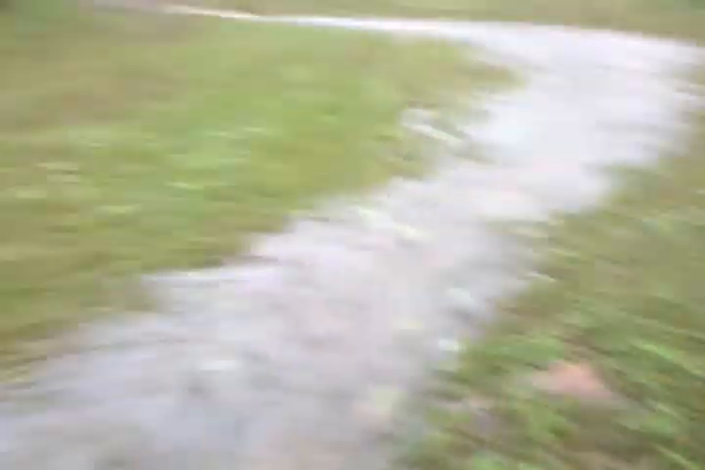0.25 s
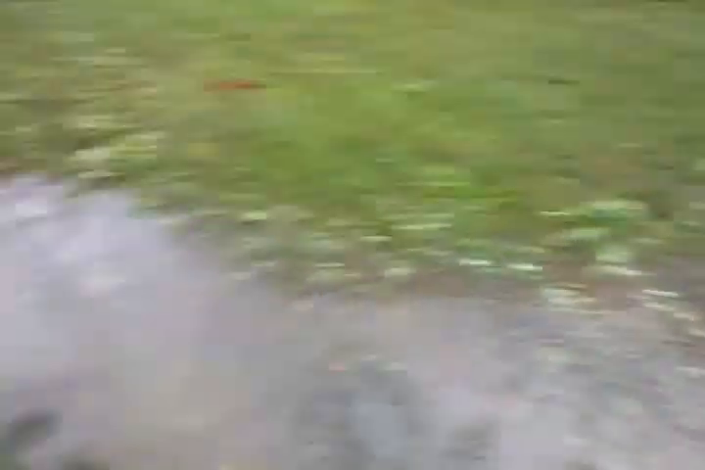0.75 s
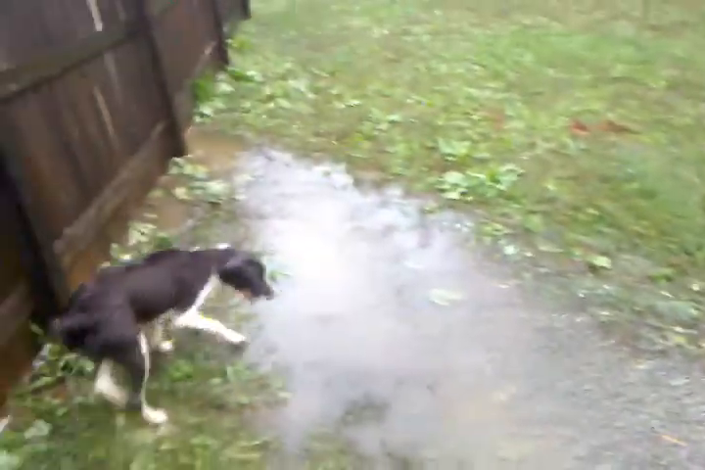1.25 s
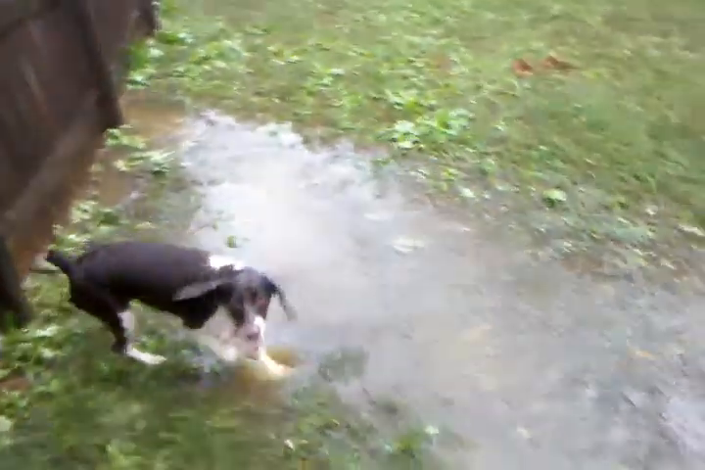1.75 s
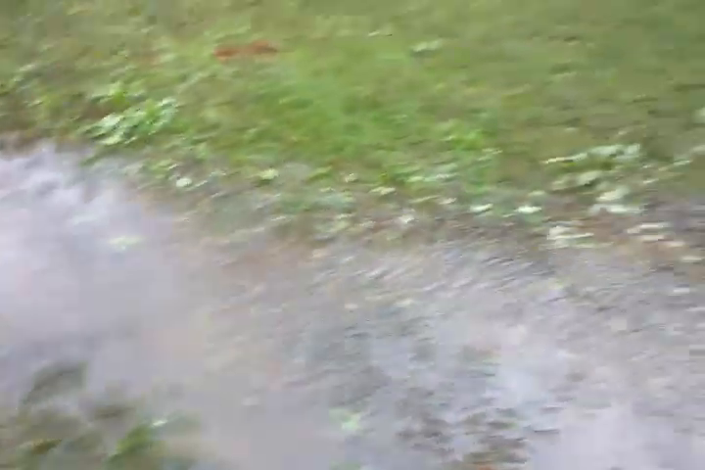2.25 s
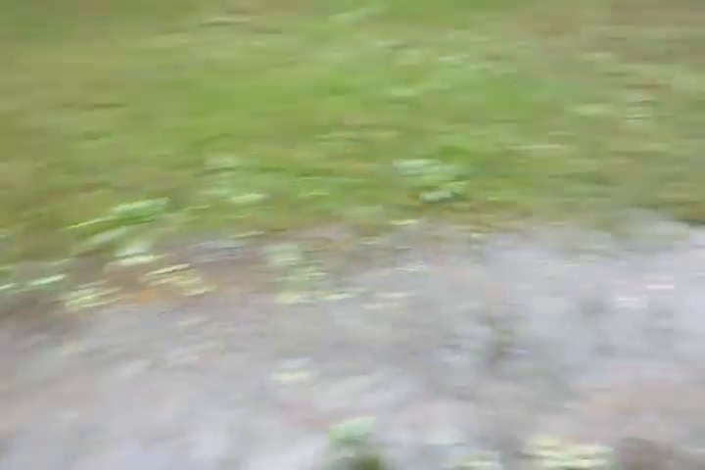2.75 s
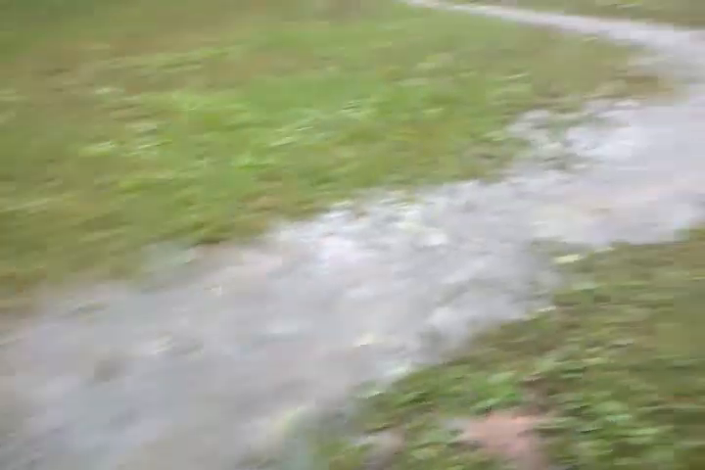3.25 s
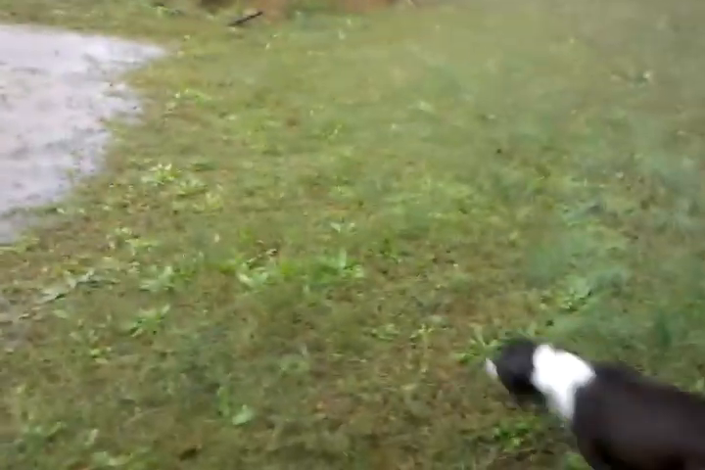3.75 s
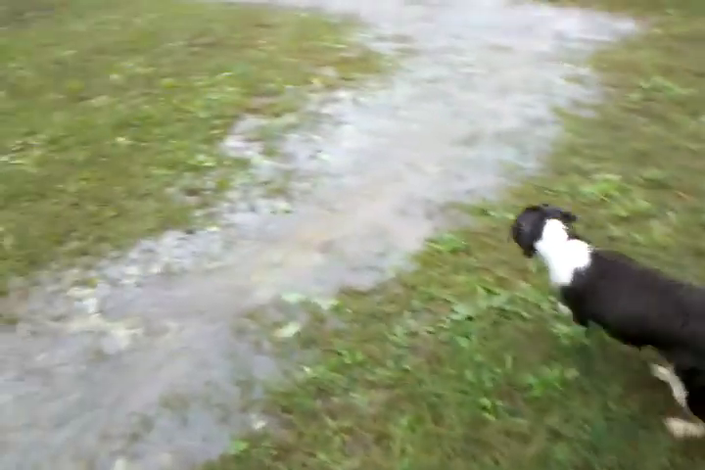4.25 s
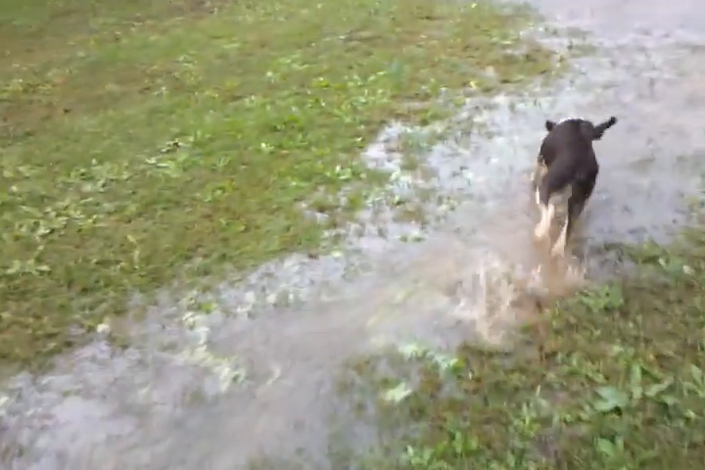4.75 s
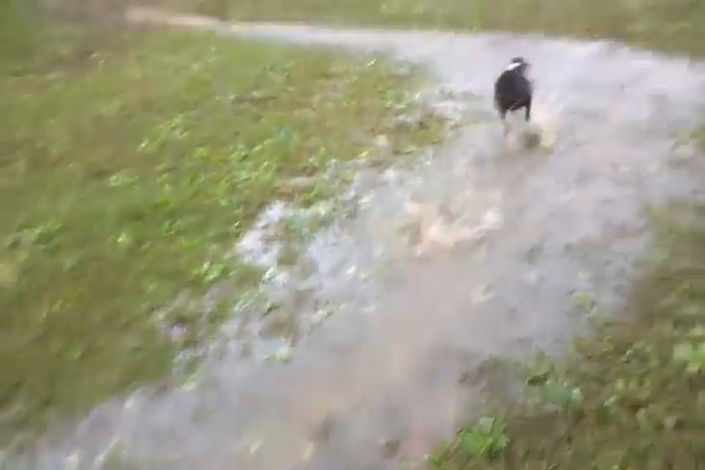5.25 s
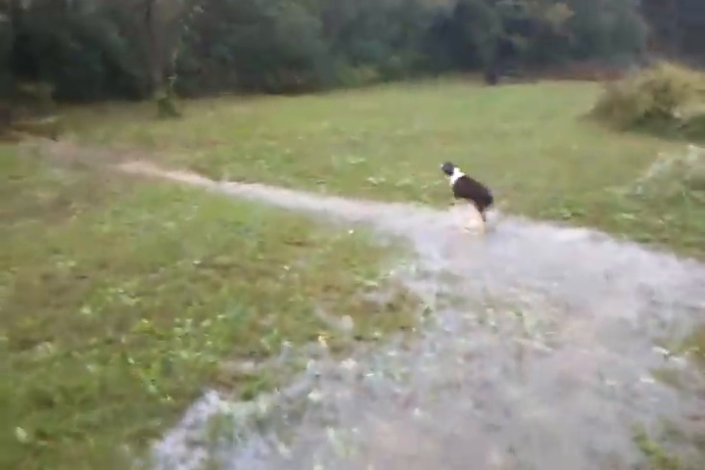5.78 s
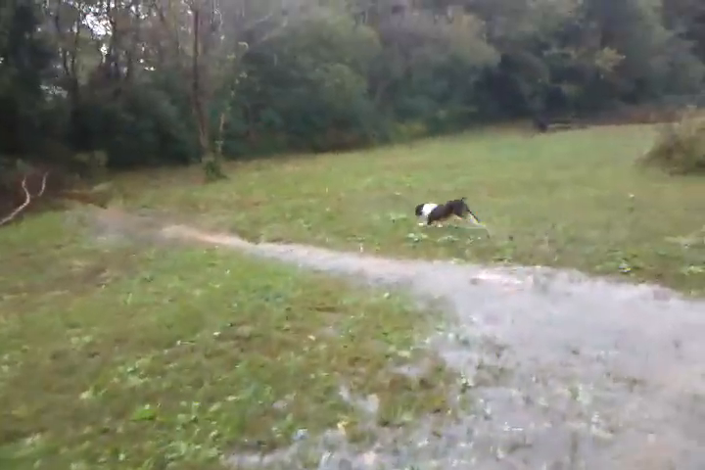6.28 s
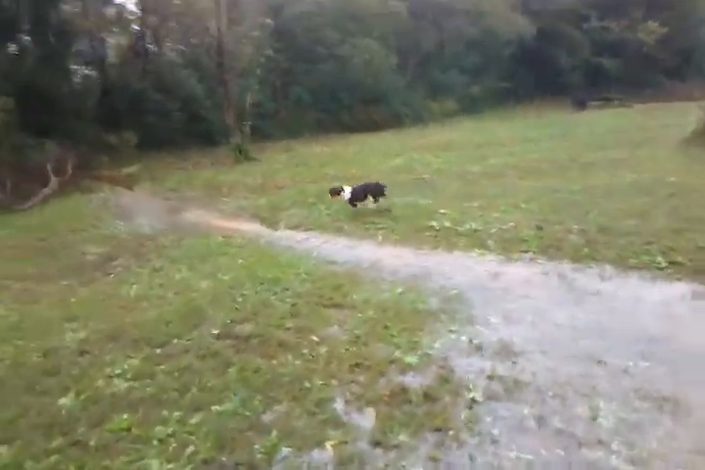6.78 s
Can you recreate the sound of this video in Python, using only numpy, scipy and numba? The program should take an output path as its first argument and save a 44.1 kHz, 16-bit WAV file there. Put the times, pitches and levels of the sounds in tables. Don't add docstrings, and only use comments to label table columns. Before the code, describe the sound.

A dog trots, then gallops through soaked grass and puddles, paws slapping and sloshing with bright spray over light rain patter and low rumble.

```python
import sys
import numpy as np
from scipy import signal
from scipy.fft import rfft, irfft
from scipy.io import wavfile
from scipy.ndimage import uniform_filter1d, map_coordinates
from numba import njit

SR = 44100
rng = np.random.default_rng(int(sys.argv[2]) if len(sys.argv) > 2 else 0)


def volts(x):
    e = np.asarray(x, float) / 20
    return 10 ** e


def unload_wav(signal):
    wavfile.write(
        sys.argv[1],
        SR,
        np.round(np.clip(np.atleast_2d(signal).T, -1, 1) * 32767).astype(np.int16),
    )


N = 309558
TIME = np.arange(N) / SR


def colour(table, hz):
    table_hz, level_db = np.transpose(table)
    return np.interp(np.log(np.maximum(hz, 1)), np.log(table_hz), level_db)


def walk(rate_hz):
    hold = int(SR / rate_hz)
    steps = np.repeat(rng.standard_normal(N // hold + 1), hold)
    return uniform_filter1d(uniform_filter1d(steps, hold), hold)[:N]


@njit
def ring(start, hz, t60_s, glide, size, n, rise_cycles):
    out = np.zeros(n)
    for k in range(len(start)):
        steps = max(int(t60_s[k] * SR), 1)
        w = 2 * np.pi * hz[k] / SR
        z = size[k] + 0j
        spin = np.exp(1j * w - np.log(1000.) / steps)
        climb = np.exp(1j * w * glide / steps)
        unrisen = 1.
        rise = np.exp(-w / (2 * np.pi * rise_cycles))
        for i in range(start[k], min(start[k] + steps, n)):
            z *= spin
            spin *= climb
            unrisen *= rise
            out[i] += z.imag * (1 - unrisen)
    return out


# start_s, left_lag_samples, left_minus_right_db
BEARING = [(0, -1.5, -4), (.55, -2.5, -4.5), (.7, -10.5, 2.5), (1.2, -4, 3.5), (1.7, -5.5, 3.5),
           (2.2, 6.5, -0.5), (2.6, -11, 4), (3, 9.5, -1.5), (3.5, 9.5, -5.5), (4.2, 6.5, -2.5),
           (4.6, 5.5, -1), (5.5, 2.5, -2.5), (6.2, 2, -3.5), (6.6, 2.5, -0.5), (7.02, 1, -4.5)]


def bearing():
    start_s, *columns = np.transpose(BEARING)
    return [np.interp(TIME, start_s, c) for c in columns]


# freq_hz, density_db_per_hz
RUMBLE = [(18, -49), (30, -29), (86, 3), (157, 5.5), (204, 3), (248, 0.5), (630, -10), (767, -15),
          (1500, -23), (1950, -49), (3300, -120)]
RUMBLE_DB, HISS_DB = -56.5, -59
HUM_HZ, HUM_DB = 119.4, -68


def rumble():
    hz = np.arange(N // 2 + 1) * SR / N
    mid, side = irfft(rfft(rng.standard_normal((2, N))) * volts(colour(RUMBLE, hz)), N)
    gain = volts(RUMBLE_DB + 0.11 * walk(1.14) + 1.16 * walk(8.7)) / np.std(mid)
    roar = gain * (mid + 0.36 * side * np.array([[1], [-1]])) * volts([[.7], [-.7]])
    hum = volts(HUM_DB + 3 * walk(6)) * np.sin(2 * np.pi * HUM_HZ * TIME)
    hiss = volts(HISS_DB) * rng.standard_normal((2, N))
    return roar + hum + hiss


PLOP_GLIDE = .12
PLOP_PAN_DB, PLOP_PAN_SHARE = -1.5, .3
# start_s, peak_db, pitch_hz
GLUGS = [(5.677, -18.5, 680), (5.799, -24, 620), (5.805, -26, 500), (5.82, -27, 560), (5.83, -29, 520),
         (5.755, -32, 420), (5.696, -31, 680), (5.711, -31, 1200), (5.73, -35, 950), (5.51, -31, 800),
         (5.527, -32, 1000), (5.663, -33, 1700), (5.824, -30, 1350), (5.934, -32, 1300), (4.92, -27, 950),
         (4.934, -27, 1050), (4.962, -27, 1100), (4.987, -27, 1000), (4.994, -29, 620), (5.006, -30, 800),
         (5.148, -29, 1000), (5.178, -31, 1150), (5.022, -33, 1150), (3.353, -31, 1150), (3.377, -33, 1400),
         (3.66, -37, 1100), (.283, -37, 950), (6.204, -34, 1180), (3.99, -36, 590), (3.834, -38, 1430),
         (6.985, -32, 1890), (5.443, -37, 1330)]
GLUG_RING_S = .022


def glugs():
    start_s, peak_db, hz = np.transpose(GLUGS)
    start = (start_s * SR).astype(np.int64)
    lag, pan_db = (c[start] for c in bearing())
    t60_s = GLUG_RING_S + 0 * hz

    def port(side, late):
        size = volts(peak_db - 8.5 + side * PLOP_PAN_SHARE * pan_db)
        return ring(start + late, hz, t60_s, PLOP_GLIDE, size, N, .2)

    return np.array([port(.5, lag.astype(np.int64)), port(-.5, 0)])


# start_s, peak_db, pitch_hz
CAVITIES = [(.13, -24, 3470), (.203, -39, 1410), (.206, -32, 1900), (.532, -28, 3720), (.605, -29, 1680),
            (.836, -23.5, 1760), (0.836, -29, 1280), (1.063, -25, 2480), (1.065, -31.5, 1300),
            (1.43, -30, 1850), (1.437, -24, 3210), (1.438, -19.5, 3640), (1.438, -29, 2660),
            (1.7, -22.5, 1710), (1.702, -25.5, 1250), (2.065, -30, 2260), (2.382, -29, 840),
            (2.409, -29, 1376), (3.361, -40, 1330), (3.362, -22, 1780), (3.364, -42, 2230),
            (3.481, -31, 976),
            (4.426, -33, 2430), (4.601, -23, 2200), (4.616, -30, 1330), (4.642, -28, 1240), (4.9, -36, 1110),
         (4.902, -39, 765), (4.903, -12, 2470), (4.974, -25, 597), (5.125, -29, 710), (5.128, -31, 3770),
         (5.14, -35, 675), (5.175, -24, 1890), (5.318, -28, 2720), (5.321, -29, 2180), (5.688, -34, 680),
         (5.769, -27, 3400), (5.77, -28, 3700), (5.801, -27, 2670), (5.812, -36, 900), (6.938, -29, 1260)]
# start_s, peak_db, pitch_hz
DRIPS = [(.925, -32, 954), (1.16, -36.5, 570), (1.727, -36, 875), (1.788, -37, 1210), (1.925, -31.5, 1280),
         (2.035, -34.5, 1250), (2.745, -37, 540), (4.749, -35, 1010), (4.846, -28.5, 1250),
         (5.911, -29.5, 1280), (6.096, -32, 640), (2.97, -40.5, 910), (6.718, -39, 670), (.398, -33, 5500),
         (.848, -31, 1500), (.855, -44, 900), (.893, -26, 2480), (1.775, -38, 2500), (1.83, -41, 1720),
         (1.84, -38, 710), (1.87, -44, 1300), (5.22, -32, 1900), (5.86, -36, 800), (5.155, -32, 950)]
CAVITY_RING_S, DRIP_RING_S = 0.032, 0.04
SATELLITE_DB, SATELLITE_S, SATELLITE_OCTAVES, SATELLITE_RING = -9.5, .014, 0.397, 0.57


def plops(count=4):
    cavities = CAVITIES
    start_s, peak_db, hz = np.transpose([*cavities, *DRIPS])[:, :, None]
    events = len(start_s)
    shed = np.arange(count) > 0
    parent_s = np.where(np.arange(events) < len(cavities), CAVITY_RING_S, DRIP_RING_S)
    t60_s = np.outer(parent_s, np.where(shed, SATELLITE_RING, 1.)).ravel()
    when, pitch, big = rng.standard_normal((events, 3, count)).transpose(1, 0, 2) * shed
    start = ((start_s + np.abs(when) * SATELLITE_S) * SR).astype(np.int64).ravel()
    hz = (hz * 2 ** (SATELLITE_OCTAVES * pitch)).ravel()
    peak_db = (peak_db + SATELLITE_DB * shed + 2.7 * big).ravel()
    lag, pan_db = (c[start] for c in bearing())
    pan_db = PLOP_PAN_DB + PLOP_PAN_SHARE * pan_db

    def port(side, late):
        return ring(start + late, hz, t60_s, PLOP_GLIDE, volts(peak_db - 8.5 + side * pan_db), N, .2)

    return np.array([port(0.7, lag.astype(np.int64)), port(-0.45, 0)])


# start_s, peak_db,
# centre_hz, length_ms
SLAPS = [(0.1245, -21.5, 4050, .8), (.652, -23.5, 6750, 1.7), (0.7588, -40, 7700, 7.3),
         (.8353, -33, 6650, 4.2), (1.06, -37, 6550, 13), (1.204, -35, 6530, 6.9), (1.4327, -29, 5100, 2.6),
         (1.5165, -30, 6000, 1.3), (1.694, -30, 5630, 3.9), (1.8149, -35, 9000, .8), (2.307, -31, 7200, 3),
         (2.6324, -23, 7140, 3.6), (3.186, -24.5, 7440, 3.3), (3.4811, -21, 7600, 3.5),
         (3.529, -20, 8700, 5.7), (3.7117, -25, 6900, 1.2), (3.9524, -22, 7440, 4.3),
         (4.0068, -23, 6900, 1.5), (4.2654, -17.5, 7800, 3.1), (4.3389, -24, 7000, 5),
         (4.413, -20, 6170, .7), (4.429, -18, 5800, 3.8), (4.503, -24, 5900, 4.2),
         (4.592, -17.5, 6200, 2.8), (4.6122, -25, 6900, 5), (4.769, -18, 8100, .58),
         (4.7815, -19, 6600, 2.1), (4.9748, -18.5, 6050, 1.7), (5.628, -16.5, 6350, .9),
         (6.8765, -32, 7500, 2.6),
         (.204, -32.5, 1400, 4.9), (.216, -34, 1610, 10.8), (.835, -38.5, 1640, 13),
             (1.4332, -31, 2550, 13), (2.382, -32, 1240, 3), (2.393, -40, 2480, 14),
             (3.3536, -31.5, 1900, 8.1), (4.902, -19, 1500, 3.14), (4.973, -28.5, 750, 6.6),
             (5.127, -28, 870, 2), (5.797, -37, 704, 15.2), (0.97, -33, 3000, 1.4), (3.298, -34, 2500, 3),
             (4.867, -23, 6500, 2), (0.63, -33, 4000, 7), (.606, -33, 4000, 7), (4.617, -28, 1760, 1.6),
             (1.79, -42, 1110, 32), (6.724, -41, 420, 5.1), (0.527, -32, 3300, 3), (.968, -32, 5500, 4.9),
             (6.226, -31, 4500, 2.9), (2.74, -42, 650, 12), (2.97, -44, 1200, 25), (5.78, -42, 310, 25),
         (.1315, -31, 4000, 1.5), (.2414, -36, 5400, 2), (.397, -36, 6500, 4), (.5935, -36, 5400, 2),
         (1.7025, -30, 8000, 2), (1.949, -30, 5800, 2.5), (2.389, -33, 4700, 2), (3.3657, -29, 4200, 1.2),
         (3.734, -32, 5000, 1.2), (3.649, -34, 5000, 1), (4.02, -27, 6500, 2), (4.878, -28, 1900, 2),
         (4.89, -25, 2600, 1.5), (4.805, -34, 2500, 1.5), (5.126, -30, 5000, 2), (5.276, -29, 3000, 1.5),
         (5.4667, -33, 4500, 2), (5.4802, -28, 4900, 2), (5.517, -29, 5000, 1.5), (5.528, -28, 5000, 1.5),
         (5.575, -31, 5000, 1.5), (5.6763, -30, 3500, 1.5), (5.756, -31, 7500, 2), (5.771, -25, 4500, 1.2),
         (5.794, -27, 5000, 1.5), (6.7314, -40, 3700, 1.5), (6.951, -24, 4500, .8), (6.9888, -27, 7300, 2),
         (6.908, -36, 1800, 1.5), (4.2645, -36, 1400, 3), (3.482, -38, 700, 2), (.26, -38, 1800, 2),
         (.203, -36, 700, 1), (4.591, -32, 2000, 2), (4.639, -33, 1200, 4), (2.301, -33, 6500, 1),
         (1.073, -29, 4500, 1), (.893, -35, 3000, 1.5), (1.694, -29, 5000, .7), (2.382, -29, 1200, .8),
         (5.127, -26, 1000, 1), (.203, -30, 1400, .8), (4.903, -35, 330, 8), (4.975, -35, 330, 10),
         (5.6285, -20, 5000, .8), (.652, -24, 5500, .6), (4.413, -22, 8000, .5), (5.32, -40, 650, 20),
         (4.592, -24, 10000, 2), (4.768, -25, 9500, 3)]
SLAP_PAN_DB, SLAP_PAN_SHARE = 0, 0.54


def slaps(count=60):
    start_s, peak_db, hz, ms = np.transpose(SLAPS)[:, :, None]
    draws = rng.standard_normal((len(start_s), 5, count)).transpose(1, 0, 2)
    when, pitch, common, left, right = draws
    delay_s = (np.abs(when) - .25 * np.abs(common)) * ms / 1000
    start = ((start_s + delay_s) * SR).astype(np.int64)
    lag, pan_db = (c[start] for c in bearing())
    pan_db = SLAP_PAN_DB + SLAP_PAN_SHARE * pan_db
    pitch_hz = np.clip(hz * 2 ** (.45 * pitch), 200, 14000).ravel()
    size = np.sqrt(ms * hz / 70000) * np.sign(common) * np.exp(-.5 * np.abs(when))

    def port(side, late, own):
        port_size = size * (1 + 0.62 * own) * volts(peak_db - .5 + side * pan_db)
        return ring((start + late).ravel(), pitch_hz, 13. / pitch_hz, 0.19, port_size.ravel(), N, 0.35)

    return np.array([port(0.53, lag.astype(np.int64), left), port(-0.53, 0, right)])


def grains(table, count, cycles, scatter_db, glide, tilt_db, patch_db):
    when, pitch, big, sign = rng.random((count, 4)).T
    start = (when * N).astype(np.int64)
    low_hz, mid_hz, high_hz = table[0][0], table[len(table) // 2][0], table[-1][0]
    hz = low_hz * (high_hz / low_hz) ** pitch
    octave = np.log2(hz / mid_hz)
    rows, columns = patch_db.shape
    clump_db = map_coordinates(patch_db, [pitch * (rows - 0.5), when * (columns - 0.5)], order=1)
    size_db = colour(table, hz) - scatter_db * np.log(1 - big) + octave * tilt_db[start] + clump_db
    size = hz * volts(size_db) * np.sign(sign - .5)
    out = ring(start, hz, cycles / hz, 1. * glide, size, N, 0.35)
    return out / np.sqrt(uniform_filter1d(out ** 2, SR // 30))


def ports(shower, lag, share):
    common = shower()
    late = map_coordinates(common, [np.arange(N) - lag], order=3, mode="nearest")
    share = np.clip(share, 0, 1)
    return np.sqrt(share) * np.array([late, common]) + np.sqrt(1 - share) * np.array([shower(), shower()])


# start_s, spray_db, fall_ms, slosh_minus_spray_db
STAMPS = [(.395, -45, 20, -23), (.759, -45, 30, -9), (0.835, -48.5, 82, 2.5), (1.072, -40, 35, -12),
          (1.203, -43, 31, -14), (1.317, -46, 24, -25), (1.469, -41.5, 42, -8), (1.515, -41.5, 35, -13),
          (1.867, -46, 100, -12), (2.306, -35, 14, -22), (2.528, -46.5, 38, -7), (2.704, -48, 27, -9),
          (3.187, -42, 40, -29), (3.432, -44, 15, -15), (3.48, -39, 23, -38), (3.617, -46.5, 160, -8.5),
          (4.007, -35, 114, -14), (4.384, -52, 160, -22), (4.429, -37.5, 40, -14), (4.503, -37.5, 66, -8),
          (4.751, -46, 14, 2), (4.767, -36.5, 64, -14.5), (5.128, -38, 44, -2.5), (5.628, -36, 40, -31),
          (5.676, -40.5, 29, -3), (5.796, -35, 50, -6.5), (6.062, -42, 79, -7.5), (6.72, -54.5, 70, -5.5),
          (6.875, -38, 35, -15), (.527, -40.5, 20, -8), (4.266, -34, 10, -25), (4.34, -40, 8, -25),
          (4.868, -31, 25, -12), (5.467, -41, 12, -12), (3.529, -38, 10, -30)]
# start_s, spray_db, fall_ms, slosh_minus_spray_db
SWEEPS = [(.13, -41, 40, -27), (.545, -40.5, 28, -9), (0.609, -40.5, 20, -2.5), (.647, -39, 18, -13),
          (0.981, -39.5, 34, -12), (1.438, -42, 21, -4.5), (1.701, -33, 7.4, -16), (1.732, -44.5, 16, -12),
          (1.951, -34.5, 15, -30), (2.395, -42.5, 36, -1.5), (2.464, -39.5, 13, -17), (2.795, -53, 50, -4),
          (2.897, -54, 14, -21), (3.052, -44, 26, -15), (3.28, -42.5, 62, -9), (3.366, -43.5, 21, 1),
          (3.713, -35.5, 9, -22.4), (3.738, -42, 20, -15), (3.874, -35.5, 67, -16), (4.158, -41, 14, -9),
          (4.645, -31.5, 46, -11), (4.824, -34.5, 25, -10.5), (4.912, -26.5, 34, -12), (5.295, -35, 65, -9),
          (5.768, -35, 20, -10.5), (6.6, -53, 41, -3), (6.988, -37, 26, -10), (.245, -43, 7.9, -6),
          (5.49, -41.5, 25, -4), (6.29, -46, 55, -8), (1.066, -36, 12, -14), (.84, -42, 12, -8),
          (1.93, -44, 18, -8), (2.03, -49, 30, -2), (1.19, -56, 40, 6), (4.495, -41, 22, -8),
          (4.23, -46, 40, -18), (5.37, -41, 22, -12), (5.785, -38, 15, -12)]
# start_s, spray_db, rise_ms, slosh_minus_spray_db
PULLS = [(2.1, -49, 60, -8), (2.197, -43.5, 104, -10), (2.668, -47, 56, -8), (3.119, -41, 25, -13),
         (4.977, -37, 99, -2), (5.548, -32, 60, -14), (6.243, -31, 33, -15.5), (6.2, -38.5, 60, -17),
         (0.168, -42, 18, -20), (1.88, -56, 70, 5), (2.056, -54, 32, 6), (5.91, -58, 60, 8.5),
         (.29, -52.5, 45, 1), (4.17, -54.5, 60, -11), (6.951, -35, 45, -8.5), (4.999, -41, 20, -5),
         (5.58, -37, 30, -13), (5.836, -35.5, 30, -12), (5.345, -38, 40, -12)]
TOUCH_MS, STAMP_RISE, SWEEP_RISE, PULL_FALL = 1.8, .08, 0.83, 0.37


def strikes():
    stamps = [(s, db, TOUCH_MS + STAMP_RISE * ms, ms, rel) for s, db, ms, rel in STAMPS]
    sweeps = [(s, db, SWEEP_RISE * ms, ms, rel) for s, db, ms, rel in SWEEPS]
    pulls = [(s, db, ms, PULL_FALL * ms, rel) for s, db, ms, rel in PULLS]
    return stamps + sweeps + pulls


# start_s, spray_db
RAIN = [(0, -50), (.22, -46.5), (.7, -53), (1.4, -50), (1.62, -55), (1.8, -50), (2.05, -55), (2.4, -45.5),
        (2.8, -56.5), (3.0, -48.5), (3.45, -47.5), (3.8, -52), (4.05, -43), (4.4, -51.5), (5.2, -40),
        (5.42, -45.5), (6.1, -44.5), (6.32, -56)]
RAIN_SLOSH_DB = -7


def swell(slosh, pan_share, steep):
    power = volts(2 * (np.interp(TIME, *np.transpose(RAIN)) + slosh * RAIN_SLOSH_DB))
    for start_s, spray_db, rise_ms, fall_ms, slosh_db in strikes():
        first = max(int((start_s - .003 * rise_ms) * SR), 0)
        part = slice(first, int((start_s + .003 * fall_ms) * SR))
        after_s = TIME[part] - start_s
        reach = np.abs(after_s / np.where(after_s < 0, rise_ms, fall_ms) * 1000)
        power[part] += volts(2 * (spray_db + slosh * slosh_db)) * np.exp(-2 * reach ** steep)
    return np.sqrt(power) * volts(np.array([[.5], [-.5]]) * pan_share * bearing()[1])


# freq_hz, density_db_per_hz
DROPLETS = [(1800, -18), (2600, -7.5), (3600, -4.5), (5500, 1), (8000, -1), (10500, -7.5), (14000, -11)]
# freq_hz, density_db_per_hz
BUBBLES = [(220, -8), (450, -10.5), (640, -3), (1000, -1.5), (1500, -2.5), (2200, -2), (3800, -2)]
SPRAY_TILT_DB, SLOSH_TILT_DB = 0.82, -0.43
GURGLE_DB = -7.5
COMMON_NEAR, COMMON_FAR, FAR_S = 0.14, 0.34, 5.3


def water():
    lag = bearing()[0]
    share = np.where(TIME < FAR_S, COMMON_NEAR, COMMON_FAR)
    even = np.ones(N)
    fine, coarse = rng.standard_normal((2, 8, 280))

    def droplets():
        return grains(DROPLETS, count=50000, cycles=14.3, scatter_db=0.33, glide=0.19,
                      tilt_db=SPRAY_TILT_DB * even, patch_db=3.0 * fine)

    def bubbles():
        return grains(BUBBLES, count=8000, cycles=15.4, scatter_db=2.5, glide=0.38,
                      tilt_db=SLOSH_TILT_DB * even, patch_db=2.8 * coarse)

    def large_bubbles():
        return grains(BUBBLES, count=1400, cycles=25.0, scatter_db=3.5, glide=0.15,
                      tilt_db=0 * even, patch_db=4.8 * coarse)

    spray = ports(droplets, lag, share)
    slosh = 0.92 * ports(bubbles, lag, share + 0.2)
    slosh = slosh + volts(GURGLE_DB) * ports(large_bubbles, lag, share + 0.47)
    spray_level = swell(0, 1, steep=1.7) * volts(1.33 * walk(55))
    slosh_level = swell(1, .3, steep=1.5) * volts(0.83 * walk(35))
    return spray * spray_level + slosh * slosh_level


def scene():
    return rumble() + glugs() + plops() + slaps() + water()


def top_cut(x):
    return signal.sosfilt(signal.butter(12, 14730, fs=SR, output="sos"), x)


PORT_HZ, PORT_WIDTH_HZ, PORT_DB = 7970, 1040, 5.5
FACING_S, FACING_DB = (4.0, 4.9), 4
TOP_HZ = 13900


def record(dry):
    hz = np.arange(N // 2 + 1) * SR / N
    left, right = rfft(dry)
    mid = (left + right) / 2
    side = (left - right) / 2 * (0.54 + 0.46 * hz ** 2 / (hz ** 2 + 800 ** 2))
    peak = np.exp(-((hz - PORT_HZ) / PORT_WIDTH_HZ) ** 2)
    bump = (peak + 0.013) * (hz > 3000) - 0.13 * (hz < 400)
    port_gain = volts(PORT_DB * bump * np.array([[-.3], [.7]]))
    x = irfft((mid + side * np.array([[1], [-1]])) * port_gain, N)
    cavity = irfft(rfft(x) * peak, N)
    facing_db = np.interp(TIME, FACING_S, (-.4 * FACING_DB, 0.46 * FACING_DB))
    x = x + (volts(facing_db) - 1) * cavity
    x = signal.sosfilt(signal.butter(2, 50, "high", fs=SR, output="sos"), x)
    x = signal.sosfilt(signal.ellip(8, .2, 63, TOP_HZ, fs=SR, output="sos"), x)
    return top_cut(x)


dry = scene()
out = record(dry)
unload_wav(out)
```